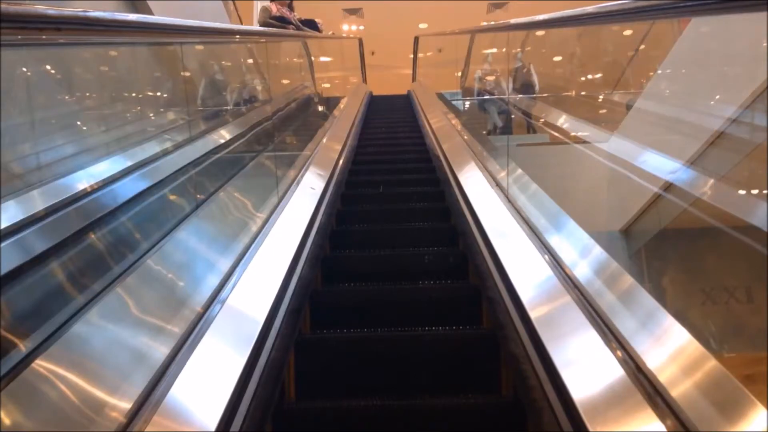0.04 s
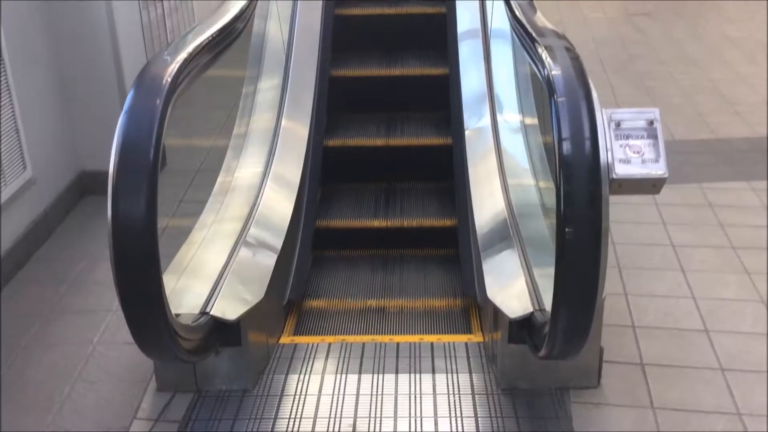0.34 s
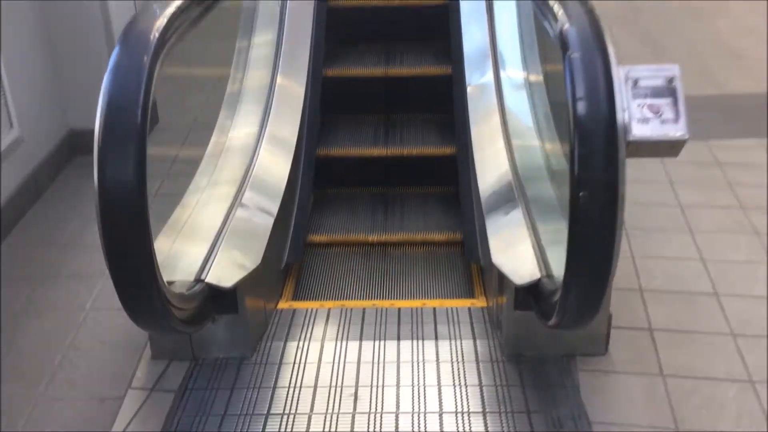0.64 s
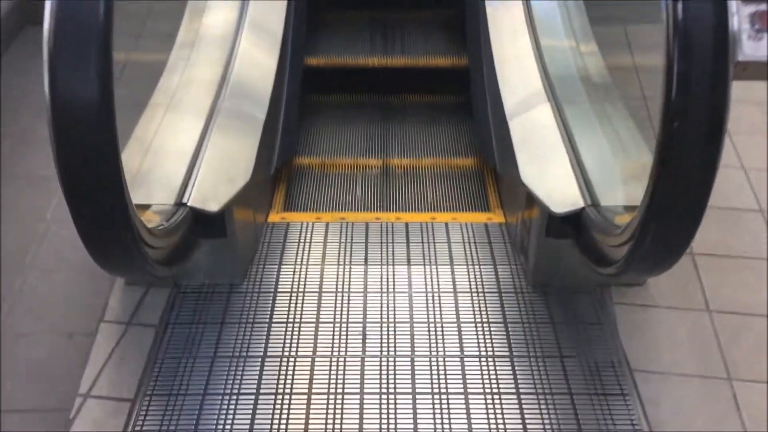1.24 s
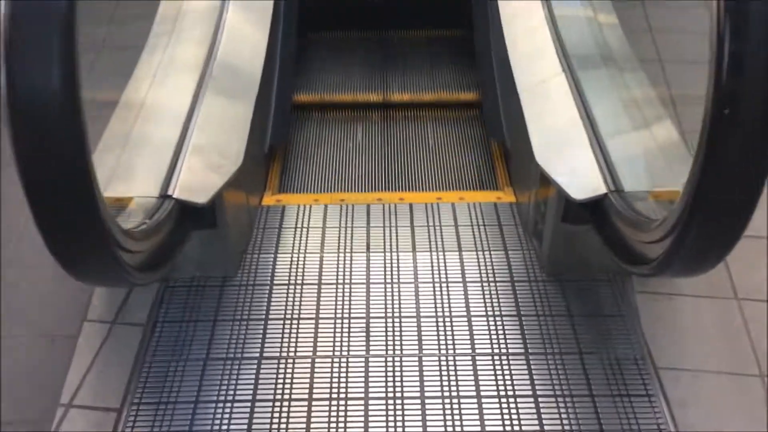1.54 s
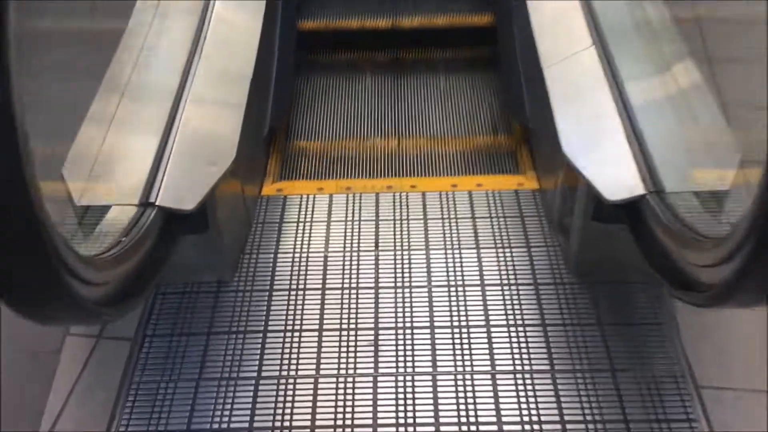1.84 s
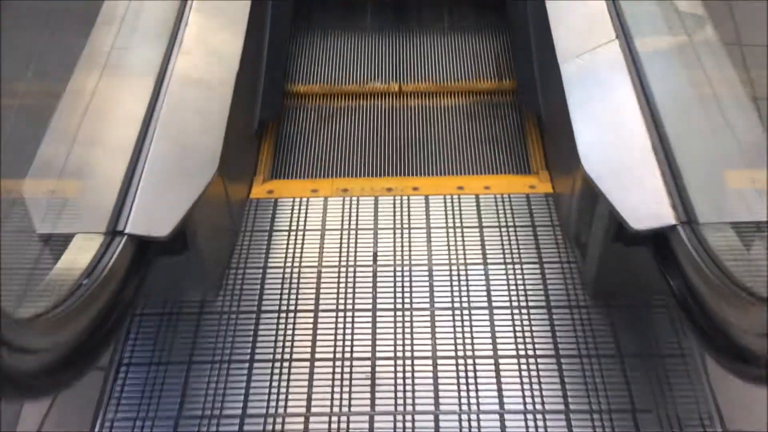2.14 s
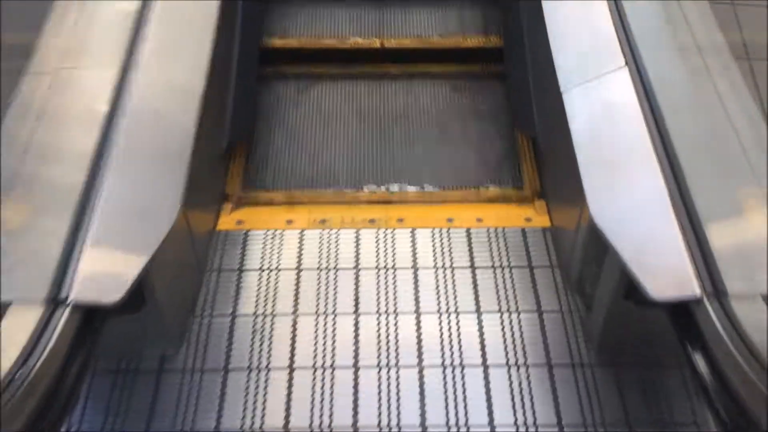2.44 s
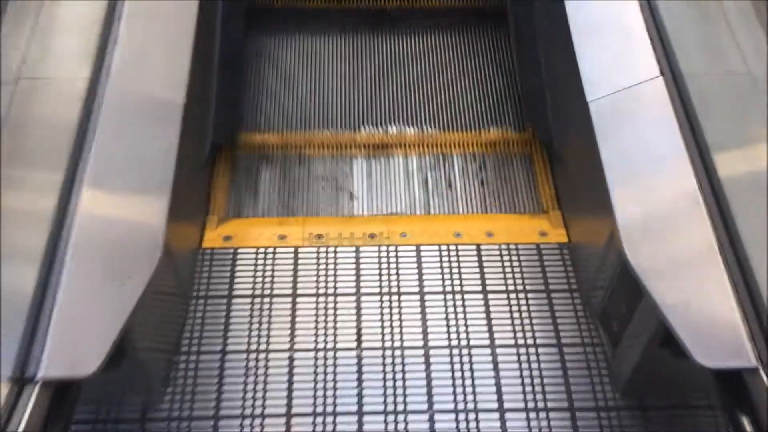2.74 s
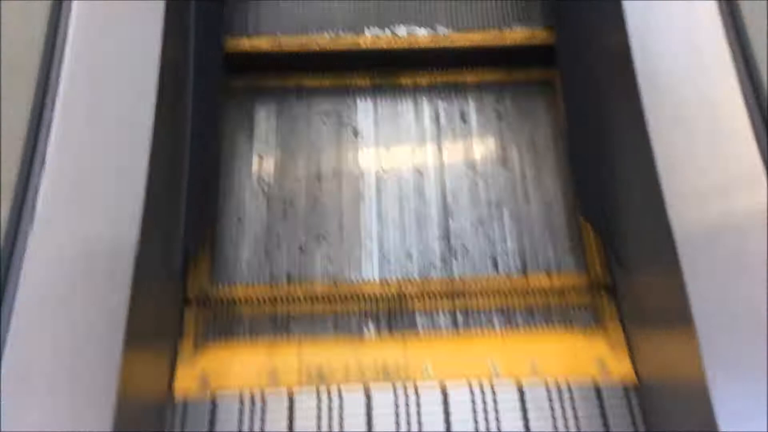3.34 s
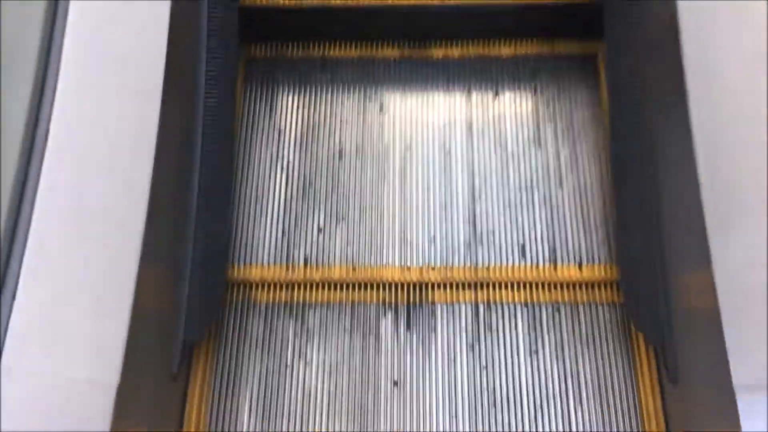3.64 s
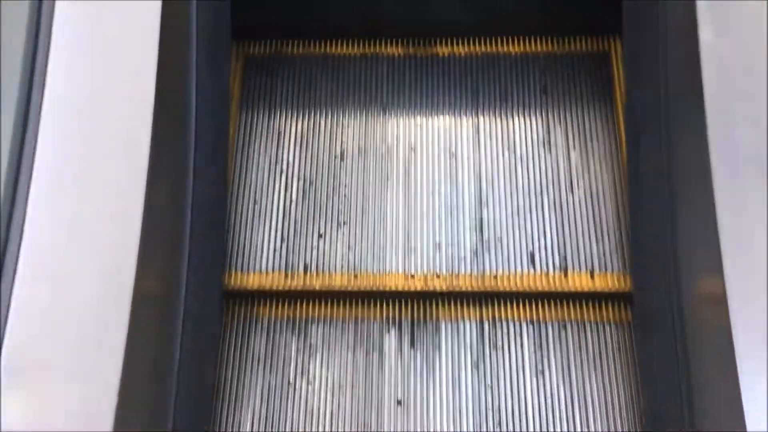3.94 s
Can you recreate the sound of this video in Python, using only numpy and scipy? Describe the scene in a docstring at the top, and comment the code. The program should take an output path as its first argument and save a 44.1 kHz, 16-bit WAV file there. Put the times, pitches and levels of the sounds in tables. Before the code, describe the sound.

An escalator runs with a steady low rumble and hum in a hard-walled hall. Metal clicks once, then the treads hiss brighter as the microphone approaches, while steps clack and the landing plate knocks and thuds underfoot.

```python
"""Walking onto an escalator.

A running escalator in a hard-walled hall. The truss rumbles and bumps, the drive hums, and the step
wheels roll in their tracks. Treads hiss through the comb plate, brighter as it comes close.
Steps clack, metal clicks once, and the landing plate knocks and thuds underfoot."""
import sys
import numpy as np
from scipy import signal
from scipy.fft import rfft, irfft, next_fast_len
from scipy.io import wavfile
from scipy.ndimage import uniform_filter1d, map_coordinates

SR = 44100
rng = np.random.default_rng(int(sys.argv[2]) if len(sys.argv) > 2 else 0)


def generate_wav(sig):
    """Save sig (samples, or channels by samples) to the path in sys.argv[1] as 16-bit PCM at SR."""
    pcm = np.round(np.clip(np.atleast_2d(sig).T, -1, 1) * 32767).astype(np.int16)
    wavfile.write(sys.argv[1], SR, pcm)


N = 176400

# Source levels along the walk. Each row: time in seconds, level in dB.
RUMBLE_DB = [(.2, -39), (.6, -41), (1.1, -41), (2.3, -41.5), (2.85, -41), (3.05, -37.5), (3.3, -39),
             (3.7, -38.5), (4, -36)]
TRACK_DB = [(.2, -46), (.27, -45), (.36, -47), (1.0, -46), (1.5, -47.5), (1.8, -45.5), (2.4, -46.5),
            (2.75, -45.5), (3.4, -46), (4, -45)]
COMB_DB = [(.2, -76), (.35, -78.5), (.5, -75.5), (1.1, -72), (1.6, -66), (2.0, -66), (2.35, -62),
           (2.5, -58.5), (2.68, -53.5), (2.85, -53), (3.08, -52), (3.38, -53.5), (3.58, -58.5),
           (3.85, -60.5), (4, -58)]
SIZZLE_DB = [(.2, -105), (1.2, -100), (1.7, -94), (2.2, -79), (2.7, -79), (3.2, -73), (3.65, -70),
             (4, -73.5)]
HUM_DB = [(.2, -62), (.36, -65), (.43, -57), (.5, -58), (.58, -50), (.7, -47), (1.03, -47), (1.17, -64),
          (1.5, -52), (1.88, -54.5), (2.05, -66.5), (2.9, -57.5), (3.2, -55), (4, -53)]
SQUEAK_DB = [(.2, -75.5), (1.6, -71.5), (2.4, -70), (4, -74)]
# Noise spectra. Each row: frequency in Hz, relative density in dB.
RUMBLE_SPECTRUM = [(20, -45), (45, -46), (72, -17.5), (88, -19), (120, -7.5), (170, 1), (200, 1), (280, -4),
                   (335, -3.5), (390, -16), (600, -21), (1500, -72)]
TRACK_SPECTRUM = [(150, -23), (400, 3), (560, 1), (700, 1.5), (900, -3), (1300, -2.5), (1650, -4.5),
                  (2000, -8.5), (3000, -10.5), (4300, -16.5), (5100, -20.5), (5900, -31.5), (7200, -58),
                  (9500, -68), (12000, -61), (15000, -84)]
CLACK_SPECTRUM = [(100, -27), (500, 5.5), (1200, 7.5), (1900, 1), (3000, -1.5), (5000, -6.5), (7000, -20),
                  (15000, -32)]
COMB_SPECTRUM = [(1000, -19), (3000, 9), (4500, 4), (5700, 4), (6500, 3), (7400, -2), (8500, -2),
                 (10000, -5.5), (12000, -16.5), (15800, -34)]
SIZZLE_SPECTRUM = [(7000, -38), (10000, -2.5), (12000, 3.5), (15800, 0)]
# Step bumps in the truss. Each row: start in seconds, level in dB, centre in Hz.
TRUSS_BUMPS = [(.365, -32, 236.5), (.574, -33, 231), (.655, -38, 196), (.845, -33.5, 280), (.897, -32, 216),
               (1.203, -36, 208), (1.376, -33.5, 247), (1.59, -29, 212.5), (1.76, -29.5, 205),
               (1.867, -36, 213), (2.056, -35, 248), (2.238, -30, 217), (2.378, -32, 199), (2.51, -33, 189),
               (2.595, -31, 188), (2.79, -31.5, 278), (2.905, -33, 189), (3.105, -26.5, 204),
               (3.17, -30.5, 164.6), (3.296, -30, 218.5), (3.594, -34, 221), (3.836, -32, 243),
               (3.937, -30.5, 203)]
# Modes of a bump. Each row: ratio to the centre, relative level in dB.
TRUSS_MODES = [(1.001, 1), (1.43, -8.5)]
# Step clacks. Each row: time in seconds, level in dB, rise and T60 in seconds, centre in Hz.
STEP_CLACKS = [(.695, -41.5, .017, .12, 1260), (1.205, -45, .0046, .06, 1270),
               (1.745, -43, 0.012, .19, 2030), (1.811, -43, .0023, .06, 1660),
               (2.012, -43.5, .0045, .12, 1400), (2.42, -47, .013, 0.16, 3400),
               (2.549, -43, .008, 0.14, 1900), (2.563, -34, .0008, 0.056, 1330),
               (2.573, -37.5, .0008, .05, 1910), (2.581, -41, .0008, .12, 1250),
               (2.695, -42.5, 0.014, 0.12, 1400), (2.709, -33.5, .001, .05, 1260),
               (2.716, -38, .0008, 0.076, 1160), (2.737, -46, .002, 0.087, 1100),
               (2.757, -43, .003, .15, 750), (2.822, -41, 0.0034, .07, 1700), (2.831, -42, .001, .07, 1260),
               (3.155, -42.5, .015, 0.15, 1120), (3.262, -39.5, .001, 0.076, 1470),
               (3.289, -41, .001, 0.055, 1500), (3.365, -42.5, .003, 0.19, 2960),
               (3.373, -41.5, .001, .12, 1400), (3.3895, -32, .0006, 0.041, 2054),
               (3.397, -39, .0008, 0.051, 1310), (3.404, -36, .0006, 0.036, 1400),
               (3.413, -41, .0008, .04, 1140), (3.478, -38.5, .001, 0.1, 2290),
               (3.488, -42, 0.0022, 0.097, 1300), (3.502, -35.5, .004, 0.079, 2340),
               (3.511, -40, .001, 0.079, 2020), (3.523, -40.5, .001, .07, 1510),
               (3.549, -41.5, .004, 0.12, 1320), (3.622, -43, .002, .17, 3440),
               (3.646, -48, .002, .07, 2380), (3.795, -42.5, .003, .14, 1220)]
# Landing plate knocks. Each row: time in seconds, level in dB, T60 in seconds, centre in Hz.
PLATE_KNOCKS = [(.888, -42, 0.18, 274), (2.711, -36, 0.18, 541), (2.562, -37, .07, 1330),
                (3.262, -29.5, 0.067, 719), (3.269, -33.5, 0.04, 450), (3.392, -35.5, .09, 1062),
                (3.400, -32.5, 0.22, 249), (3.512, -38, 0.13, 702)]
# Landing plate bounces. Each row: start in seconds, level in dB.
PLATE_THUDS = [(3.511, -23), (3.5246, -18), (3.5408, -18), (3.560, -22)]
# Modes of the click. Each row: frequency in Hz, relative level in dB, T60 in seconds.
METAL_MODES = [(1410, -8, .03), (1650, 3, 0.034), (2360, -11, .05), (2702, -9.5, .025), (3467, -11, .025),
               (4880, -19, .018)]
# Ringing of comb and treads. Each row: frequency in Hz, level against the hiss in dB.
COMB_RINGS = [(5889, -18), (6302, -18.5), (6473, -28), (6637, -17), (8082, -22), (8479, -28)]
# Treads brushing the teeth. Each row: time in seconds, level in dB, T60 in seconds, centre in Hz.
COMB_BRUSHES = [(.888, -64, .22, 5800), (2.105, -63, .2, 7000), (3.625, -58, .2, 6500),
                (3.657, -66, .09, 11000)]


def truss(rise_s=.009, t60_s=.16):
    """The frame rumbles and rings dully as the steps bump along."""
    rumble = coloured(noise(), RUMBLE_SPECTRUM)
    bumps = sum(amp(db + mode_db) * ring(at_s, hz * ratio, rise_s, t60_s)
                for at_s, db, hz in TRUSS_BUMPS for ratio, mode_db in TRUSS_MODES)
    return level(RUMBLE_DB) * rumble + bumps


def step_clacks(chatter_db=2.5, ring_db=-1.5):
    """Steps shift against each other: loose parts chatter over a brief ring."""
    chatter = coloured(noise() * amp(chatter_db * wobble(300)), CLACK_SPECTRUM)
    out = np.zeros(N)
    for at_s, db, rise_s, t60_s, hz in STEP_CLACKS:
        rattle = burst(at_s, rise_s, t60_s) * band(np.roll(chatter, rng.integers(N)), hz, octaves=1)
        out += amp(db) * (rattle + amp(ring_db) * ring(at_s, hz, rise_s=.00082, t60_s=.05))
    return out


def landing_plate(knock_rise_s=.001, buzz_db=-8, thud_hz=267):
    """The plate knocks hollowly and bounces on its seat."""
    knocks = np.zeros(N)
    for at_s, db, t60_s, hz in PLATE_KNOCKS:
        buzz = burst(at_s, knock_rise_s, t60_s) * band(noise(), hz, octaves=.26)
        knocks += amp(db) * (ring(at_s, hz, knock_rise_s, t60_s) + amp(buzz_db) * buzz)
    thuds = sum(amp(db) * ring(at_s, thud_hz, rise_s=.0026, t60_s=.041) for at_s, db in PLATE_THUDS)
    return knocks + thuds


def metal_click(at_s=.8852, gain_db=-27.5, crack_db=-11.5):
    """One hard contact of metal parts: ringing modes and a noisy crack."""
    modes = sum(amp(db) * ring(at_s, hz, rise_s=.00032, t60_s=t60_s) for hz, db, t60_s in METAL_MODES)
    crack = burst(at_s, rise_s=.00034, t60_s=.053) * coloured(noise(), TRACK_SPECTRUM)
    return amp(gain_db) * (modes + amp(crack_db) * crack)


def step_wheels(taps_per_s=170, rattle_db=-9):
    """Wheels roll in their tracks; loose parts rattle faintly."""
    roll = coloured(patchy_noise(spread_db=2), TRACK_SPECTRUM) * amp(.39 * wobble(15))
    taps = (rng.random(N) < taps_per_s / SR) * amp(-rng.uniform(-1.1, 1, N))
    shake = signal.fftconvolve(taps, burst(0, rise_s=.001, t60_s=.034))[:N]
    rattle = coloured(shake * noise(), TRACK_SPECTRUM)
    return level(TRACK_DB) * (roll + amp(rattle_db) * rattle)


def comb_plate(waver_db=.7, brush_rise_s=.005):
    """Grooved treads slide through the comb: hiss, thin rings, short brushes and, close up, sizzle."""
    grain, rub = patchy_noise(spread_db=2.7), patchy_noise(spread_db=2.7)
    hiss = coloured(grain, COMB_SPECTRUM) * amp(waver_db * wobble(22.05))
    rings = sum(amp(db) * band(noise(), hz, octaves=.006) for hz, db in COMB_RINGS)
    sizzle = coloured(grain, SIZZLE_SPECTRUM)
    brushes = sum(amp(db) * burst(at_s, brush_rise_s, t60_s) * band(rub, hz, octaves=.38)
                  for at_s, db, t60_s, hz in COMB_BRUSHES)
    return level(COMB_DB) * (hiss + rings) + level(SIZZLE_DB) * sizzle + brushes


def drive_hum(hum_hz=107.8, drift_rad=.49, waver_db=1.8):
    """The drive hums: one tone, wavering in phase and level."""
    tone = np.sin(2 * np.pi * hum_hz * time_s() + drift_rad * wobble(7))
    return level(HUM_DB) * unit_rms(tone * amp(waver_db * wobble(16)))


def step_squeak(centre_hz=4960, waver_hz=110, first_s=.36, period_s=.413, swing_db=5.5, flicker_db=3.4):
    """A faint, thin squeak swells as each step passes."""
    passing = np.cos(2 * np.pi * (time_s() - first_s) / period_s)
    shift_rad = 2 * np.pi * np.cumsum(waver_hz * wobble(14)) / SR
    whistle = band(noise(), centre_hz, octaves=.022)
    squeak = (signal.hilbert(whistle) * np.exp(1j * shift_rad)).real
    return level(SQUEAK_DB) * squeak * amp(swing_db * passing + flicker_db * wobble(45))


def hall(x):
    """Hard walls return a diffuse tail."""
    tail = noise() * burst(.011, rise_s=.0055, t60_s=.66)
    return signal.fftconvolve(x, tail / np.linalg.norm(tail))[:N]


def amp(db):
    """Decibels to gain."""
    return 10 ** (np.asarray(db) / 20)


def unit_rms(x):
    """Scale to rms 1."""
    return x / np.sqrt(np.mean(x ** 2) + 1e-20)


def time_s():
    """Time of each sample."""
    return np.arange(N) / SR


def noise():
    """White noise."""
    return rng.standard_normal(N)


def level(rows):
    """Gain per sample from rows of seconds and dB."""
    return amp(np.interp(time_s(), *np.transpose(rows)))


def wobble(knots_per_s):
    """Smooth random curve."""
    return map_coordinates(rng.standard_normal(2048), [time_s() * knots_per_s], mode="wrap")


def filtered(x, response):
    """Apply a gain given as a function of Hz."""
    size = next_fast_len(N + SR // 2)
    return irfft(rfft(x, size) * response(np.fft.rfftfreq(size, 1 / SR)), size)[:N]


def coloured(x, spectrum):
    """Shape by a spectrum on a log frequency axis; rms 1."""
    knots_hz, db = np.transpose(spectrum)
    return unit_rms(filtered(x, lambda hz: amp(np.interp(np.log(hz + 1), np.log(knots_hz + 1), db))))


def band(x, centre_hz, octaves):
    """Bell-shaped band-pass; rms 1."""
    return unit_rms(filtered(x, lambda hz: np.exp(-.5 * (np.log2((hz + 1) / centre_hz) / octaves) ** 2)))


def patchy_noise(spread_db):
    """White noise with brief narrow patches of random gain."""
    frames = signal.stft(noise(), nperseg=1024)[2]
    patches = uniform_filter1d(rng.standard_normal(frames.shape), size=4, axis=0)
    patches = unit_rms(uniform_filter1d(patches, size=7, axis=1))
    return signal.istft(frames * amp(spread_db * patches), nperseg=1024)[1][:N]


def burst(peak_s, rise_s, t60_s):
    """Envelope: exponential swell, then decay."""
    age_s = time_s() - peak_s
    return np.exp(np.minimum(age_s, 0) / rise_s - np.log(1000) * np.maximum(age_s, 0) / t60_s)


def ring(start_s, hz, rise_s, t60_s):
    """A struck, damped mode."""
    age_s = np.maximum(time_s() - start_s, 0)
    attack = 1 - np.exp(-(age_s / rise_s) ** 2)
    return np.sin(2 * np.pi * hz * age_s) * np.exp(-np.log(1000) * age_s / t60_s) * attack


def scene(hits_send_db=-11, click_send_db=-7):
    """The running machine, mono; clacks, plate and click excite the hall."""
    hits, click = step_clacks() + landing_plate(), metal_click()
    echo = hall(amp(hits_send_db) * hits + amp(click_send_db) * click)
    running = truss() + drive_hum() + step_wheels() + step_squeak() + comb_plate()
    return (running + hits + click + echo)[None]


def record(dry, start_s=.192, fade_s=.0015, top_hz=15800):
    """Silence until the sound cuts in; nothing above the band limit."""
    gate = np.clip((time_s() - start_s) / fade_s, 0, 1)
    return filtered(dry[0] * gate, lambda hz: hz < top_hz)[None]


dry = scene()
out = record(dry)
generate_wav(out)
```